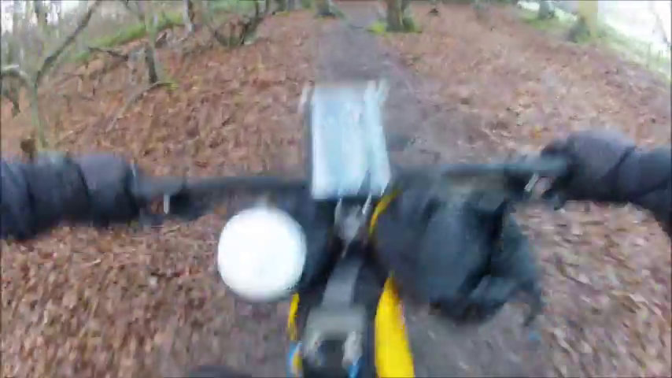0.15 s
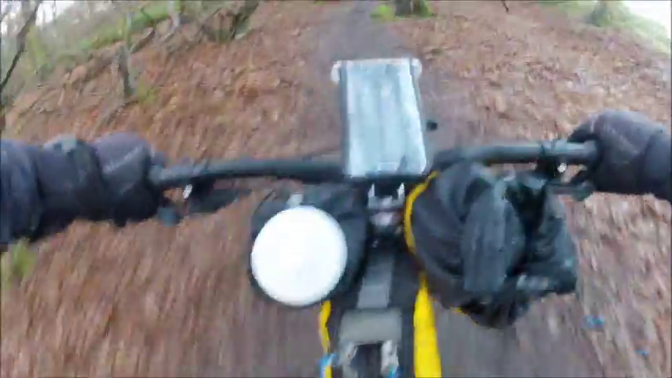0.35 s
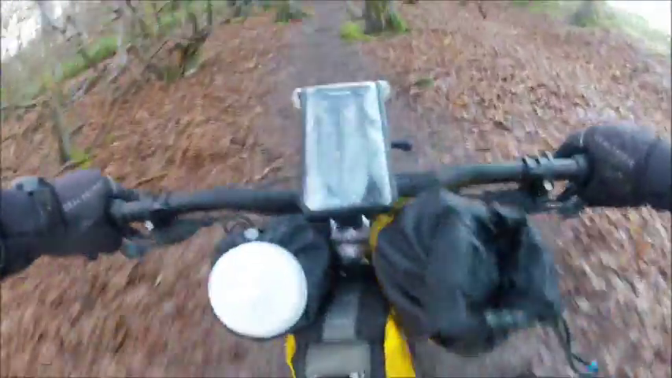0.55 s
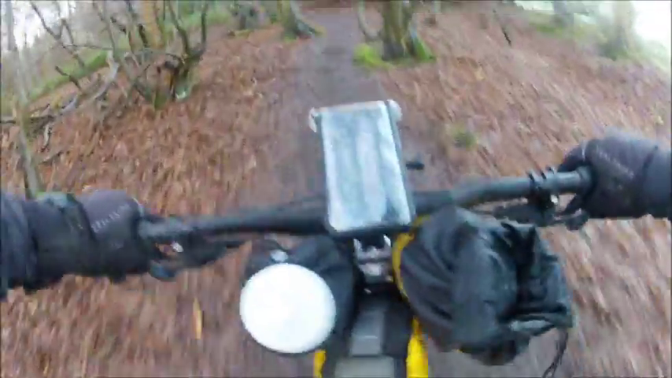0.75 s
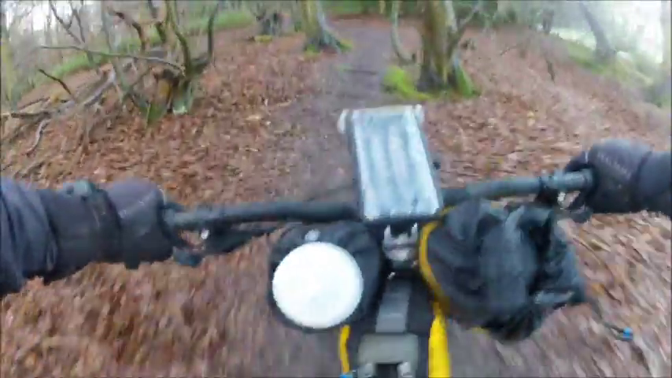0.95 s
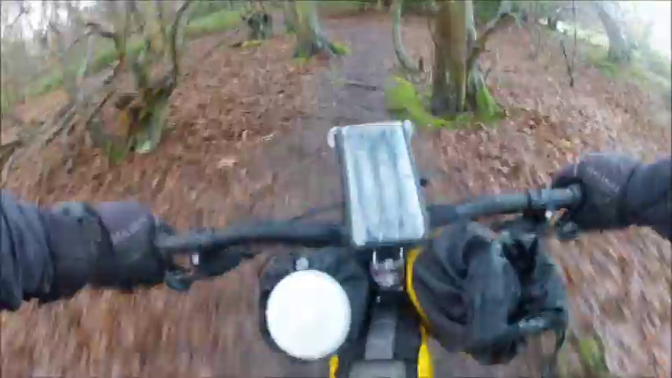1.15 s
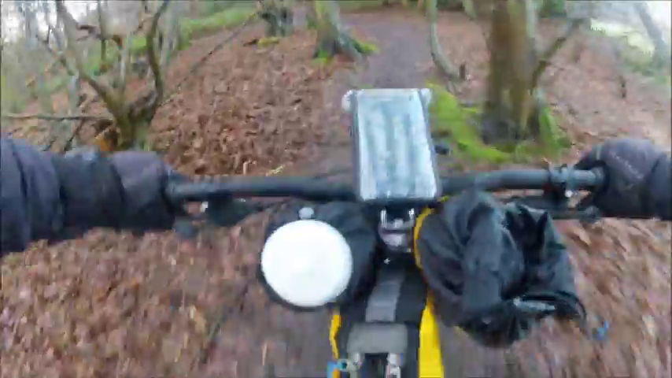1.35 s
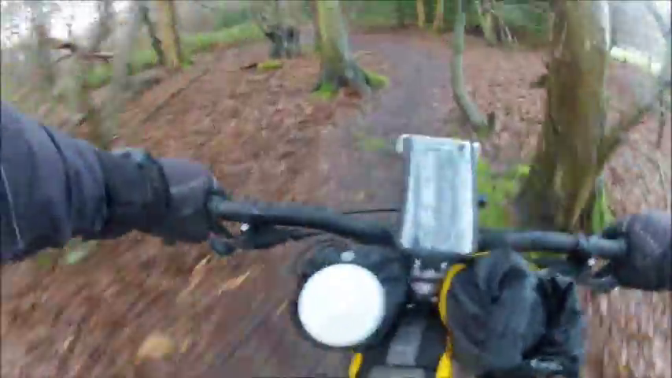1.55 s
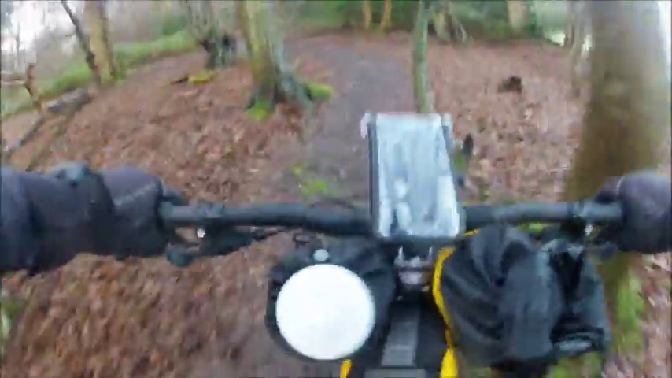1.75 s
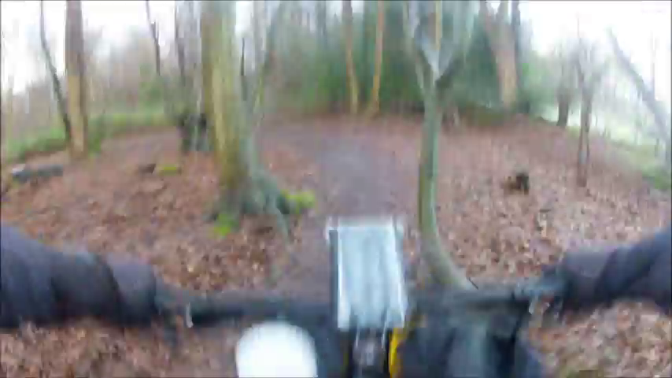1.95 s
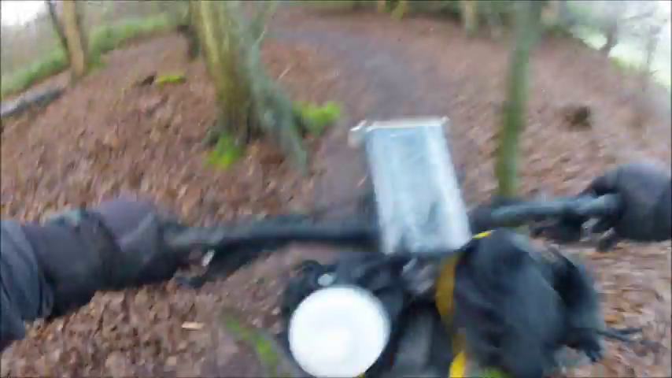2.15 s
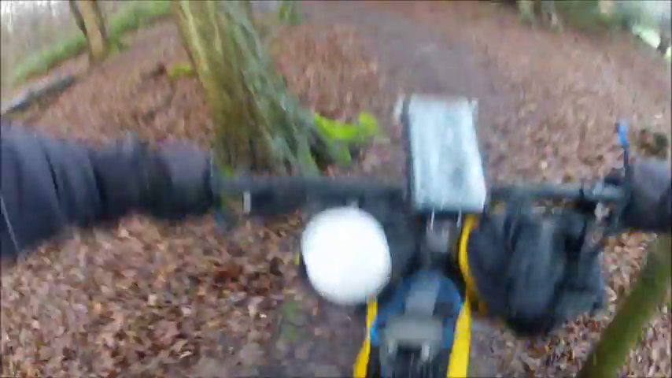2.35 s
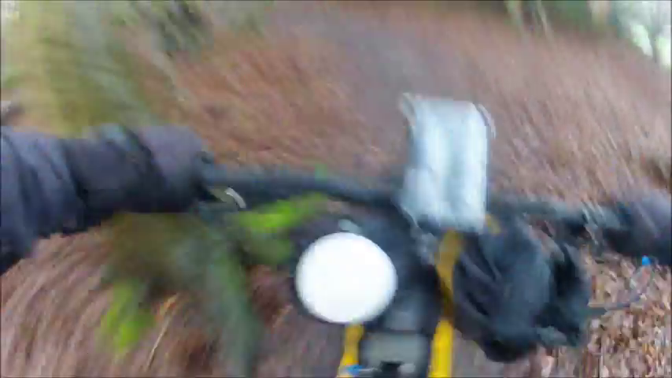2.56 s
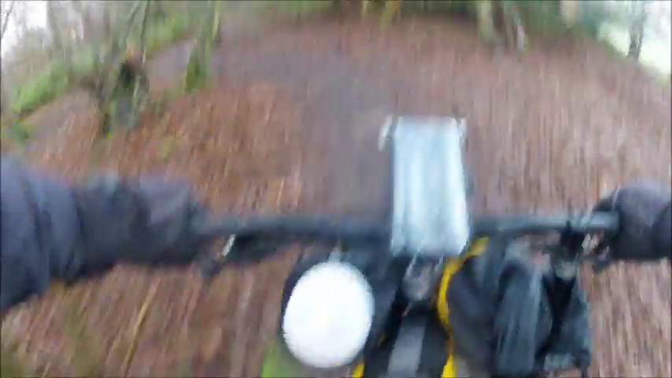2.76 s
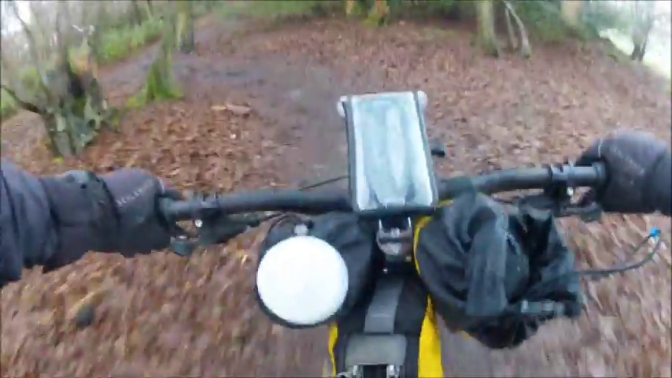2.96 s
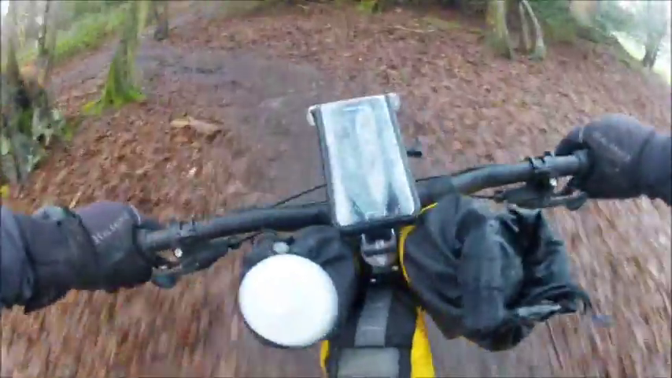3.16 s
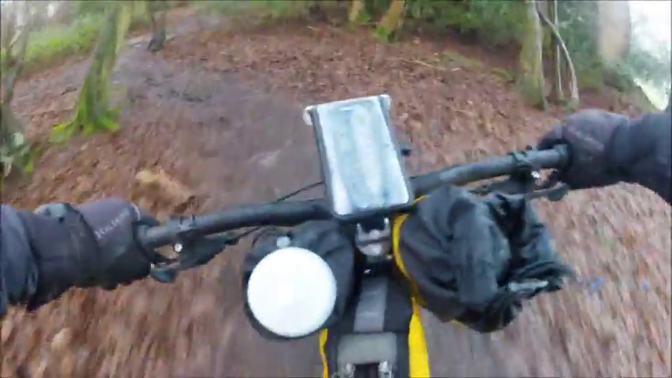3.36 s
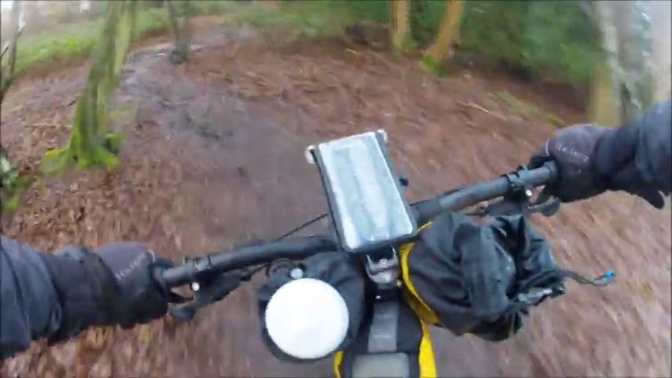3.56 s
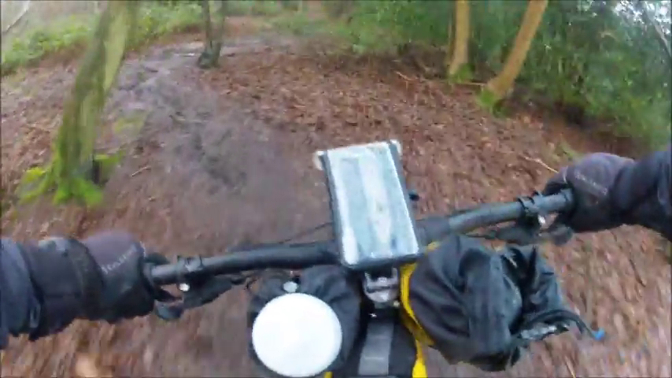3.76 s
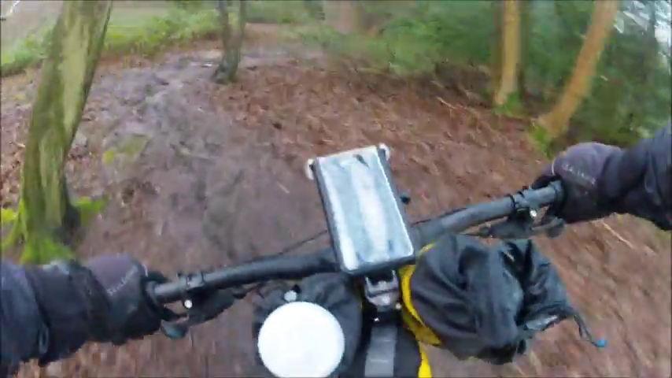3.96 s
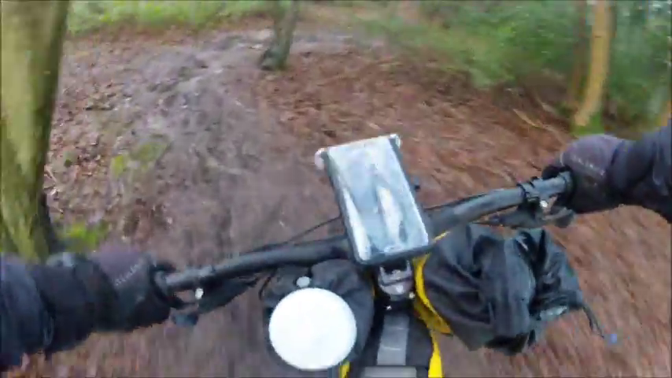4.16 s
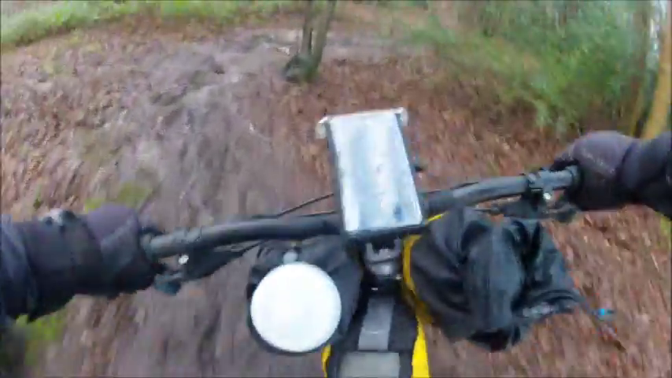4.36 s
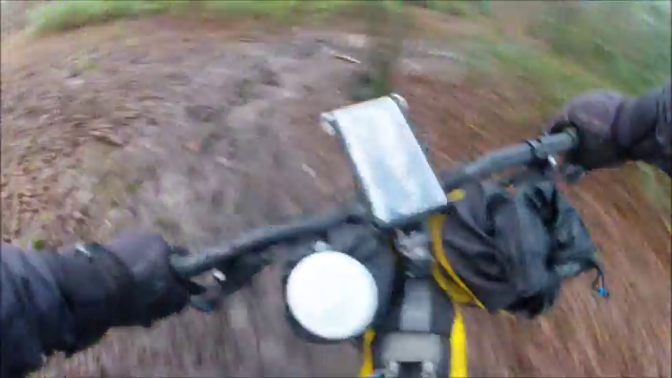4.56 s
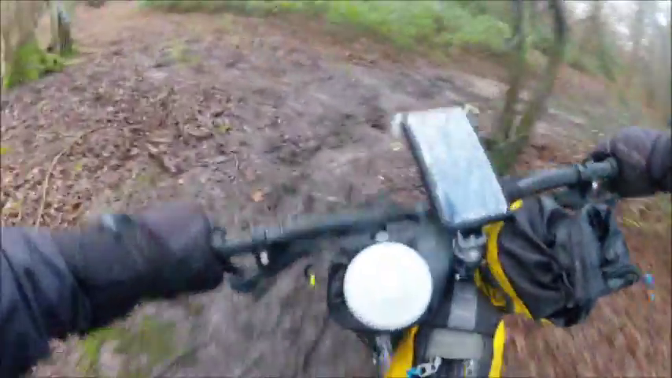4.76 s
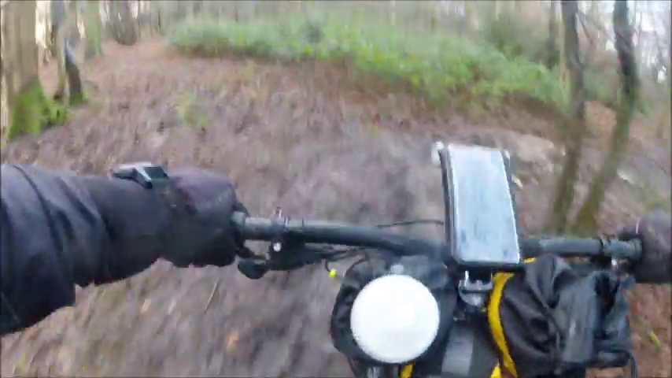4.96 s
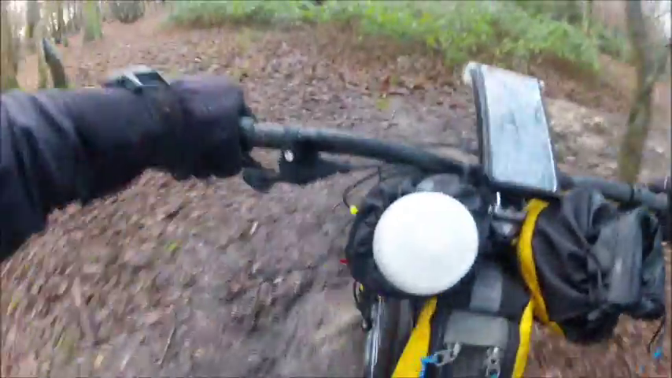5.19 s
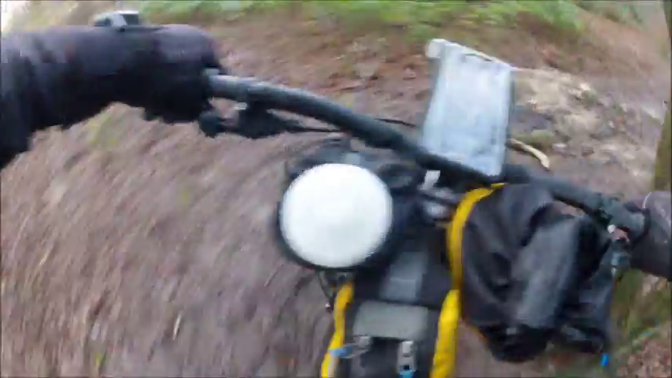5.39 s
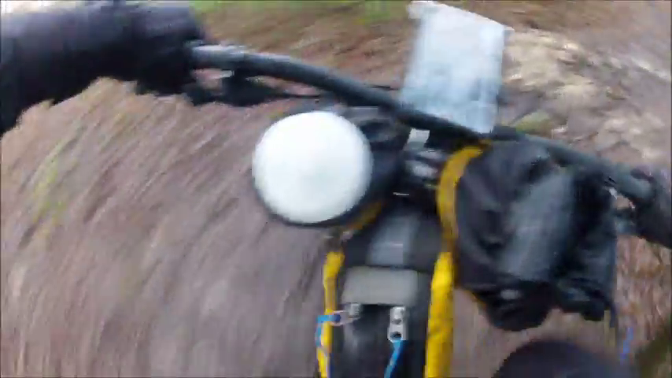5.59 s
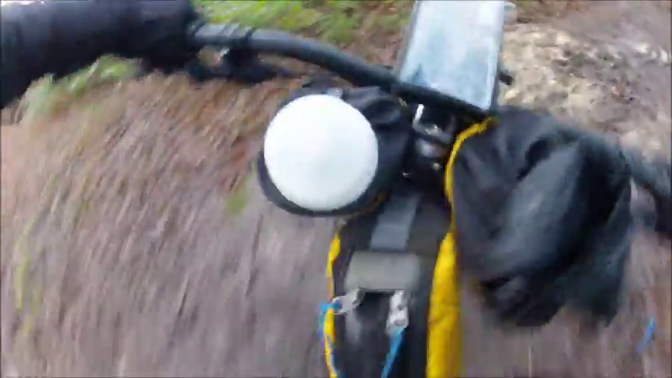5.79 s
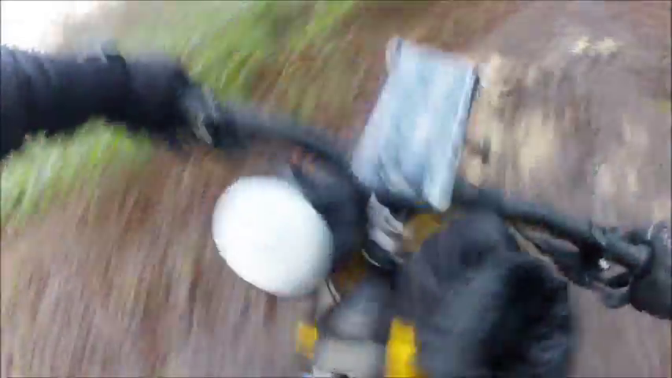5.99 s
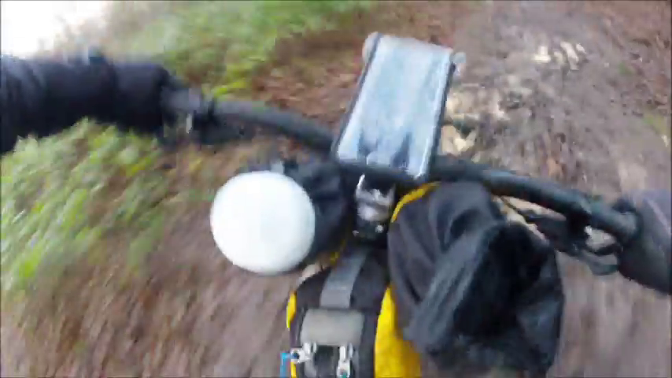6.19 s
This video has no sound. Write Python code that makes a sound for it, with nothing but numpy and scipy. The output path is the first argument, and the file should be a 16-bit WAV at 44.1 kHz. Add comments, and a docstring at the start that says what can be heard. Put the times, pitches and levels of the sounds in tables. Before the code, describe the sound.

A bicycle rolls softly over a leafy dirt trail, then bangs loudly across roots with thumps, cracks and rattling, before settling to quiet crunching.

```python
"""Loaded bicycle on a leafy trail

A loaded bicycle rolls down a dirt trail, heard close and dry from a camera on the rider.
The tyres hiss and crunch: noise and sparse grains shaped by spectra. Air and ground rumble below.
Roots thump the frame as damped sine swings; camera mount, luggage, hard parts and chain ring
as banks of resonances struck by short chattering forces. The camera limits and cuts the treble."""
import sys
import numpy as np
from scipy import signal
from scipy.fft import rfft, irfft, next_fast_len
from scipy.io import wavfile
from scipy.ndimage import uniform_filter1d, map_coordinates

SR = 44100
rng = np.random.default_rng(int(sys.argv[2]) if len(sys.argv) > 2 else 0)


def wav_record(signal):
    """Record a signal, one row per channel, as 16-bit PCM in the file named by sys.argv[1]."""
    frames = np.transpose(np.atleast_2d(signal))
    bounded = np.clip(frames, -1, 1)
    # unit amplitude maps onto the largest positive 16-bit level
    quanta = np.round(bounded * 32767).astype(np.int16)
    wavfile.write(sys.argv[1], SR, quanta)


N = 274743

# Wheels striking roots. Each row: start in seconds, relative level in dB, pitch in Hz.
ROOT_STRIKES = [(2.086, 5, 162), (2.101, 7, 219), (2.165, 3, 105), (2.277, -18.5, 86.4),
                (2.318, -17, 113.6), (2.408, -21.5, 70), (2.448, -22, 175), (2.466, -23.5, 100),
                (2.541, -32, 60), (2.606, -17, 115), (2.684, -10, 182), (2.97, -20.5, 138),
                (4.349, -37.5, 182), (5.119, -27.5, 101)]
# Roughness of the trail, highest over the roots. Each row: time in seconds, air rumble level in dB.
TRAIL_ROUGHNESS = [(0, -42.5), (0.45, -42), (1.0, -49.5), (1.98, -43), (2.12, -28), (2.45, -35),
                   (2.72, -33), (3.03, -45), (4.9, -45.5), (5.13, -43), (5.35, -45.5), (6.23, -43.5)]
SMOOTH_TRAIL_DB = -46  # rumble level that counts as an even stretch
# Resonances of the luggage, the hard parts and the chain.
# Each row: centre in Hz, width in Hz, relative level in dB.
LUGGAGE_MODES = [(206.5, 33, 3.5), (657, 80, 6.5), (971, 101, 5.5), (1810, 200, 4.5), (2430, 530, -7.5),
                 (3524, 120, -11)]
HARD_MODES = [(225, 120, -2.5), (1000, 163, 3.5), (1285, 130, 2.5), (1845, 740, 1.5), (2804, 590, 4),
              (3810, 305, 0), (4890, 380, -7), (6970, 820, -12), (8210, 1300, -10.5), (8900, 397, -13),
              (14350, 560, -24)]
CHAIN_MODES = [(2600, 840, -3.5), (3400, 400, -2), (5043, 228, 5), (6966, 220, 2), (9600, 700, -27),
               (14200, 900, -36.5)]


def amp(db):
    """Decibels to gain."""
    return 10 ** (np.asarray(db) / 20)


def unit(x):
    """Scale to rms 1."""
    return x / np.sqrt(np.mean(x ** 2) + 1e-20)


def crest(x, size=88):
    """Scale so that the loudest stretch of size samples (two milliseconds) has rms 1."""
    return x / np.sqrt(uniform_filter1d(x ** 2, size, mode="constant").max() + 1e-20)


def curve(rows):
    """Draw straight lines through (seconds, value) points, one value per sample."""
    s, values = np.transpose(rows)
    return np.interp(np.arange(N) / SR, s, values)


def wobble(rate):
    """A smooth random curve, rate knots a second."""
    knots = rng.standard_normal(int(N * rate / SR) + 4)
    return map_coordinates(knots, [np.arange(N) * rate / SR])


def filtered(x, response):
    """Multiply the spectrum of x by a complex response of frequency."""
    m = next_fast_len(len(x) + SR // 10)
    return irfft(rfft(x, m) * response(np.fft.rfftfreq(m, 1 / SR)), m)[:len(x)]


def coloured(x, spectrum):
    """Shape x by (Hz, dB) points, at rms 1."""
    f, db = np.transpose(spectrum)
    return unit(filtered(x, lambda hz: amp(np.interp(np.log(hz + 1), np.log(f), db))))


def resonate(x, modes):
    """Pass x through parallel (Hz, width in Hz, dB) resonances of alternating sign."""
    def response(f):
        total = 0
        for k, (centre, width, db) in enumerate(modes):
            damping = 1j * f * width
            total = total + (-1) ** k * amp(db) * damping / (centre * centre - f * f + damping)
        return total
    return filtered(x, response)


def lowpass(x, hz, order=2):
    """Causal Butterworth low-pass."""
    return signal.sosfilt(signal.butter(order, min(hz, SR * .45), fs=SR, output="sos"), x)


def add(track, s, x):
    """Mix x into the track at s seconds."""
    part = track[max(0, round(s * SR)):][:len(x)]
    part += x[:len(part)]


def grains(rate):
    """Sparse impulses of random size, on average rate a second."""
    return (rng.random(N) < rate / SR) * rng.standard_normal(N)


def grit(rate, share):
    """Steady noise plus sparse grains, whose rms is share times that of the noise."""
    return rng.standard_normal(N) + share * unit(grains(rate))


def patchy(x, depth_db, size=(4, 7)):
    """Give x soft random patches of gain in frequency and time, at rms 1."""
    z = signal.stft(x, nperseg=512)[2]
    field = uniform_filter1d(rng.standard_normal(z.shape), size[0], axis=0)
    field = uniform_filter1d(field, size[1], axis=1)
    return unit(signal.istft(z * amp(depth_db * unit(field)))[1][:N])


def contact(chatter, t60, hold=0.0015, evenness=0.88):
    """The force of one blow: a push, then loose surfaces chatter for a moment and settle."""
    t = np.arange(SR // 12) / SR
    fade = amp(-60 * np.maximum(t - hold, 0) / t60)
    force = rng.standard_normal(len(t)) * fade
    force *= chatter / np.linalg.norm(force)
    force[0] += 1
    # many small contacts together excite all frequencies about equally
    z = rfft(force, 2 * len(t))
    even = irfft(z / (np.abs(z) + 1e-9) ** min(evenness, 1))[:len(t)]
    return even * np.sqrt(fade)


def blows(events, modes, count, soft_hz, chatter, t60, lead):
    """Strike one object; each blow sets how strongly it rings above its first count modes."""
    track = np.zeros(N)
    for s, db, upper_db in events:
        # the softness of the contact takes the treble off the force
        force = lowpass(contact(chatter, t60), soft_hz, order=3)
        body = crest(resonate(force, modes[:count]))
        upper = crest(resonate(force, modes[count:]))
        # the sign keeps the alternation of the modes going
        add(track, s - lead, amp(db) * (body + (-1) ** count * amp(upper_db) * upper))
    return track


def tyres(lumps_db=2.5, leaf_follow=0.39, swell_db=-49, splinter_db=-13):
    """Grit and leaves crush in clumps under the tread; dry leaves add a thin crackle."""
    # Spectra of tread crunch and dry leaves. Each row: frequency in Hz, relative level in dB.
    tread_spectrum = [(150, -18), (480, -16.5), (640, 6), (800, 3.5), (980, 11), (1270, -10), (1550, -3),
                      (1850, 4), (2400, -8.5), (3000, -34), (3600, -6), (4300, -35), (6000, -56.5),
                      (15000, -49.5)]
    leaf_spectrum = [(300, 12.5), (1000, -0.5), (2500, 9), (4200, -1), (5100, -1.5), (6050, -18),
                     (7000, -3.5), (10000, -13.5), (14500, -29), (16000, -33)]
    tyre_db = tread_level()
    crunch = patchy(coloured(grit(rate=500, share=0.75), tread_spectrum), depth_db=2.0)
    # where the tread bites hardest, small stones and twigs snap and ring through the load
    bite = 1 / (1 + amp(2 * (swell_db - tyre_db)))  # one half at swell_db
    stones = unit(resonate(lowpass(grains(rate=160), 4500), LUGGAGE_MODES[1:]))
    twigs = amp(splinter_db) * unit(resonate(grains(rate=200), HARD_MODES))
    crushing = amp(tyre_db + lumps_db * wobble(60)) * (crunch + bite * (stones + twigs))
    crackle = patchy(coloured(grit(rate=150, share=0.36), leaf_spectrum), depth_db=1.0)
    return crushing + amp(leaf_follow * tyre_db - 37.5) * crackle


def tread_level(drift_db=1.5):
    """Tyre noise in dB: it drifts as it rolls and swells smoothly through each scuff."""
    # How hard the tyres press into the leaves. Each row: time in seconds, tyre noise in dB.
    rolling = [(0, -60), (0.22, -54.5), (1.0, -57.5), (1.74, -60.5), (2.0, -47), (2.18, -33.5), (2.36, -55),
               (2.52, -51), (2.69, -38), (2.8, -51), (3.0, -52.5), (3.25, -60), (3.63, -63), (4.85, -59.5),
               (4.96, -47.5), (5.25, -55.5), (5.78, -57), (6.23, -53)]
    # The tread bites into a patch of grit and leaves.
    # Each row: middle in seconds, length in seconds, peak level in dB.
    scuffs = [(0.453, 0.25, -49.5), (0.762, 0.077, -52.5), (1.4, 0.17, -54), (1.522, 0.065, -50.5),
              (1.813, 0.051, -52), (2.424, 0.11, -45), (2.925, 0.08, -47), (3.324, 0.057, -57),
              (3.494, 0.067, -50), (3.833, 0.093, -50.5), (4.359, 0.072, -50.5), (4.436, 0.043, -47.5),
              (5.32, .08, -51), (5.929, 0.13, -43.5), (6.205, 0.056, -45.5)]
    power = amp(curve(rolling) + drift_db * wobble(12)) ** 2
    for s, length, db in scuffs:
        place = np.clip((np.arange(N) / SR - s) / length, -.5, .5)
        power += (amp(db) * np.cos(np.pi * place)) ** 2
    return 10 * np.log10(power)


def root_thumps(swings=4.1, attack=0.0047):
    """Tyre and frame take each root with a few low, heavily damped swings."""
    track, t = np.zeros(N), np.arange(SR // 5) / SR
    for s, db, hz in ROOT_STRIKES:
        # 60 dB down after this many swings
        fade = amp(-60 * t * hz / swings)
        swing = np.sin(2 * np.pi * hz * t) * fade * (1 - np.exp(-t / attack))
        add(track, s, amp(db) * crest(swing))
    return amp(1.5) * track


def mount_knocks():
    """The camera mount, close to the microphone, knocks hollowly on a few resonances."""
    # Each row: time in seconds, relative level in dB, upper modes in dB re the lower ones.
    knocks = [(0.117, -17.5, -25), (2.005, -14.5, -18), (2.21, -2.5, -16.5), (2.342, -0.5, -17),
              (2.692, 7, -15.5), (3.413, -22.5, -21.5)]
    # Each row: centre in Hz, width in Hz, relative level in dB.
    mount_modes = [(407, 470, -16.5), (611.6, 65.6, 5.5), (735, 155, 3.5), (916, 109, 2.5), (1116, 42, -17),
                   (1664, 170, -10.5), (2070, 940, -26), (3400, 900, -47.5)]
    return amp(0.5) * blows(knocks, mount_modes, count=5, soft_hz=2400,
                            chatter=0.71, t60=0.062, lead=.001)


def luggage_clacks():
    """Luggage clacks against the bars and rings briefly."""
    # Each row: time in seconds, relative level in dB, upper modes in dB re the lower ones.
    clacks = [(0.223, -26.5, -25), (0.473, -24.5, -5.5), (1.309, -31, -8.5), (1.393, -44, 6),
              (1.515, -28.5, -4.5), (2.081, -11.5, -8), (2.148, 0, -11), (2.163, 0, 2), (2.199, -23, -1),
              (2.255, -26, -30), (2.313, -10, -8), (2.428, -36.5, 9), (2.607, -18, -14), (2.651, -29, -9),
              (2.678, -7, -6.5), (2.685, -8.5, -0.5), (2.748, -27, -5), (2.923, -27, -5),
              (2.969, -10.5, -5.5), (3.484, -43.5, 6), (4.078, -47.5, 5.5), (4.35, -30.5, -17.5),
              (4.644, -30, -32), (4.877, -33.5, -30), (5.116, -23.5, 2.5), (5.216, -32, -11),
              (5.374, -29.5, -3), (5.51, -31.5, -4), (5.569, -27, -6), (5.943, -33.5, 6),
              (6.134, -22.5, -10)]
    return amp(-5.0) * blows(clacks, LUGGAGE_MODES, count=3, soft_hz=3640,
                             chatter=1.51, t60=0.028, lead=0.00034)


def hard_slaps():
    """Hard parts slap together, exciting resonances far up into the treble."""
    # Each row: time in seconds, relative level in dB, upper modes in dB re the lower ones.
    cracks = [(2.0128, -31, 12), (2.030, -23.5, 9), (2.1015, 6.5, -2.5), (2.165, -6.5, -6.5),
              (2.692, -6.5, -9.5), (2.969, -22.5, -17), (5.116, -18, -3)]
    return amp(3.0) * blows(cracks, HARD_MODES, count=3, soft_hz=15100,
                            chatter=1.34, t60=0.021, lead=.0002)


def chain_ticks(rebound_db=-4, count=7):
    """The chain slaps, rebounds quickly for as long as it is shaken, then settles."""
    # Each row: start in seconds, relative level in dB, seconds before the rebounds die away.
    slaps = [(0.267, -41.5, 0.0086), (0.332, -34, 0), (0.434, -41, 0.00077), (0.481, -32, 0),
             (0.575, -47, 0), (0.669, -46.5, 0.0021), (1.172, -41, 0), (1.884, -30, 0), (1.93, -33, 0),
             (2.088, -12, 0.024), (2.1818, -11.5, 0), (2.2699, -21, 0.0045), (2.413, -26.5, 0),
             (2.431, -38, .012), (2.4718, -36.5, 0.0015), (2.613, -37, 0.019), (2.6526, -30, 0),
             (2.673, -30.5, 0.0033), (2.745, -36, 0.011), (2.771, -38.5, 0.0021), (2.824, -33.5, 0.0059),
             (2.9368, -27.5, 0.017), (4.337, -43, 0), (4.6572, -42, 0), (4.71, -35, 0), (5.143, -34, .02),
             (5.206, -38.5, 0.0077), (5.6016, -34.5, 0.0035), (5.78, -47, 0.004), (6.1306, -42.5, 0.015)]
    rebound_s, settle_t60_s = .0045, 0.021  # nominal gap between rebounds; their dying away
    track = np.zeros(N)
    for s, db, hold in slaps:
        delays = np.cumsum(rebound_s * rng.uniform(0.73, 1.4, count))
        for delay in delays - delays[0]:
            fade_db = rebound_db * (delay > 0) - 60 * max(delay - hold, 0) / settle_t60_s
            tick = crest(resonate(contact(chatter=1.15, t60=0.027), CHAIN_MODES))
            add(track, s + delay, amp(db + fade_db) * tick)
    return amp(-6.0) * track


def small_rattles(tap_rate=50, tap_db=-63, tap_hz=1800, tick_rate=45, tick_db=-79,
                  tap_follow=0.77, tick_follow=0.78):
    """Stray light taps of luggage and chain, stronger where the trail is rough."""
    rough_db = curve(TRAIL_ROUGHNESS) - SMOOTH_TRAIL_DB
    taps = unit(resonate(lowpass(grains(tap_rate), tap_hz), LUGGAGE_MODES))
    ticks = unit(resonate(grains(tick_rate), CHAIN_MODES))
    # each follow is in dB for each dB of roughness
    return amp(tap_db + tap_follow * rough_db) * taps + amp(tick_db + tick_follow * rough_db) * ticks


def ground(bump_rate=70, bump_db=-1, tyre_hz=140, jingle_db=-19, creak_db=-13,
           gust_db=2.4, uneven_db=3.0):
    """Air rumbles on the microphone; bumps shake the frame, which sets chain and luggage rattling."""
    # Spectra of air rumble and frame shudder. Each row: frequency in Hz, relative level in dB.
    rumble_spectrum = [(10, -8), (28, -2), (50, -13), (90, -16.5), (200, -39.5), (600, -81.5)]
    shudder_spectrum = [(30, -12), (65, 0), (105, -3), (190, -5), (320, -13), (500, -18), (1200, -23),
                        (4000, -44.5)]
    shudder_db, shudder_follow = -57.5, .33  # on an even stretch; dB for each dB more of rumble
    lurch_db = 1.5  # rumble of the lurching camera, re the jolts
    trail_db = curve(TRAIL_ROUGHNESS)
    jolt = jolts()
    air_level = amp(trail_db + gust_db * wobble(18)) + amp(lurch_db) * jolt
    air = air_level * coloured(rng.standard_normal(N), rumble_spectrum)
    rough_db = trail_db - SMOOTH_TRAIL_DB
    shudder = amp(shudder_db + shudder_follow * rough_db + uneven_db * wobble(25)) + jolt
    frame = amp(2.5) * coloured(rng.standard_normal(N), shudder_spectrum)
    # the soft tyres round each bump off
    rounded = lowpass(grains(bump_rate), tyre_hz, order=3)
    bumps = amp(bump_db) * coloured(rounded, shudder_spectrum)
    jingle = amp(jingle_db) * unit(resonate(grit(rate=350, share=3.4), CHAIN_MODES))
    creak = amp(creak_db) * unit(resonate(grit(rate=210, share=2.6), LUGGAGE_MODES))
    return air + shudder * (frame + bumps + jingle + creak)


def jolts():
    """The level of the shaking that each root leaves in the bike, dying away exponentially."""
    jolt_db, t60_s = -21, .15  # re the level listed for the root
    track, t = np.zeros(N), np.arange(SR // 2) / SR
    for s, db, hz in ROOT_STRIKES:
        add(track, s, amp(db + jolt_db - 60 * t / t60_s))
    return track


def scene():
    """Everything is close and dry in the open wood, summed to one channel."""
    riding = tyres() + root_thumps()
    knocking = mount_knocks() + luggage_clacks() + hard_slaps()
    rattling = chain_ticks() + small_rattles()
    return (riding + knocking + rattling + ground())[None]


def limiter(x, threshold_db=-8, attack=0.0084, release=0.028):
    """The gain ducks just after a loud blow and creeps back; peaks that get through clip."""
    # attack and release are time constants in seconds; the held peak decays exponentially
    fall = np.arange(N) / (SR * release)
    held = np.exp(np.maximum.accumulate(np.log(np.abs(x) + 1e-9) + fall) - fall)
    over = np.maximum(held / amp(threshold_db) - 1, 0)
    pole = np.exp(-1 / (SR * attack))
    excess = signal.lfilter([1 - pole], [1, -pole], over)
    return np.clip(x / (1 + excess), -.92, .92)


def record(dry):
    """The camera limits, mirrors its low band faintly around the hold rate, and cuts the top."""
    hold_hz, top_hz = 12000, 15100
    x = limiter(dry[0])
    # holding samples leaves a small sawtooth whose size follows the slope of the sound;
    # its fundamental is heard as a glassy edge
    slope = np.gradient(lowpass(x, 3700, order=6) - lowpass(x, 200, order=1)) * SR
    carrier = np.sin(2 * np.pi * hold_hz * np.arange(N) / SR)
    mirror = amp(3.0) * slope / (np.pi * hold_hz) * carrier
    return filtered(x + mirror, lambda hz: 1 / np.sqrt(1 + (hz / top_hz) ** 80))[None]


dry = scene()
out = record(dry)
wav_record(out)
```